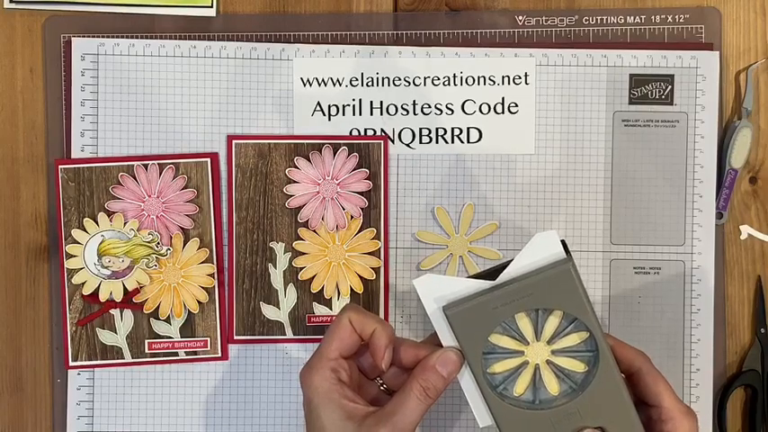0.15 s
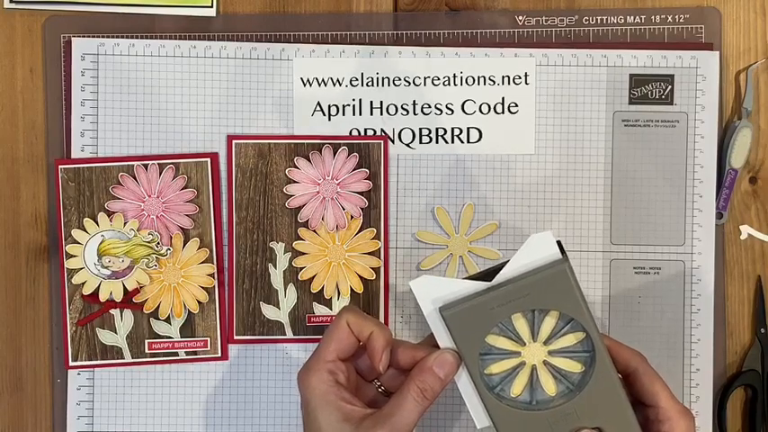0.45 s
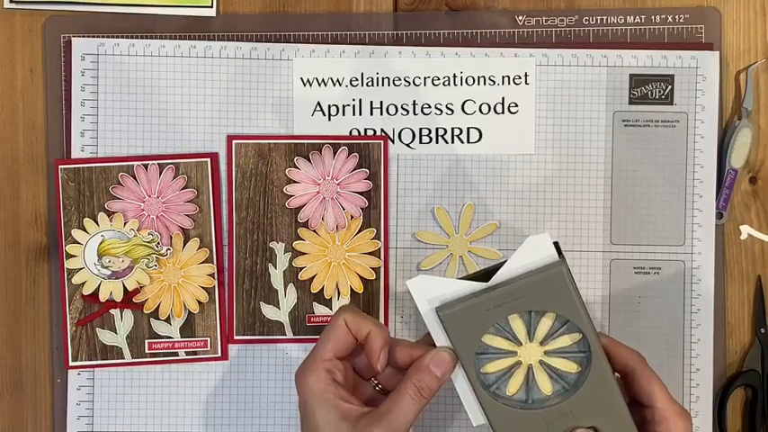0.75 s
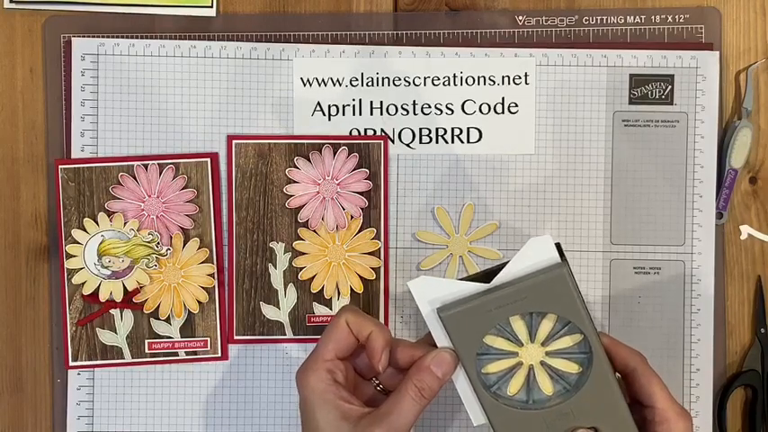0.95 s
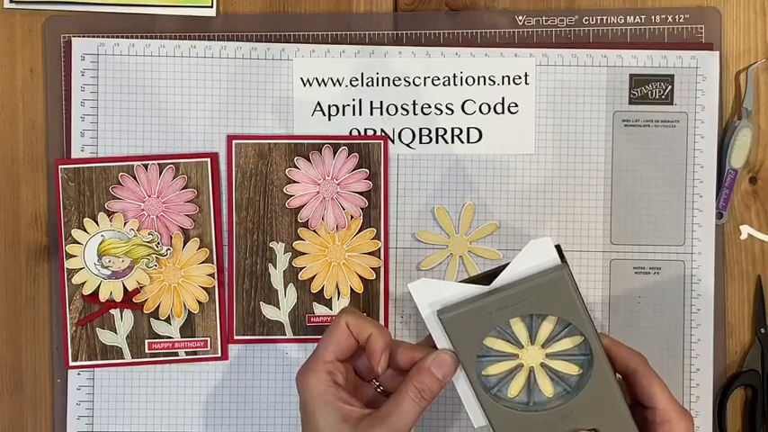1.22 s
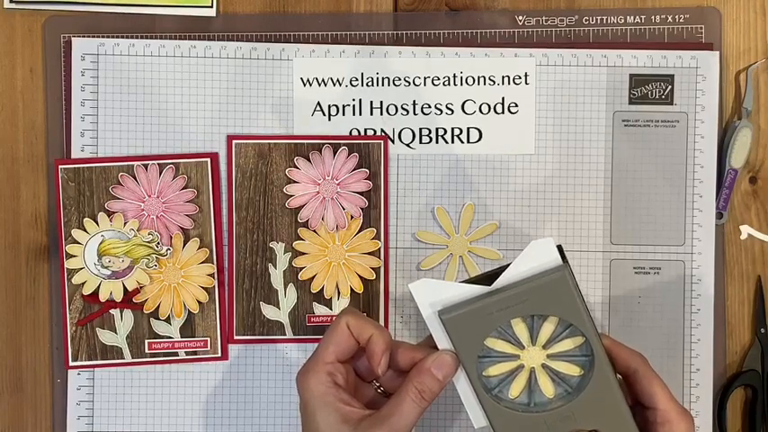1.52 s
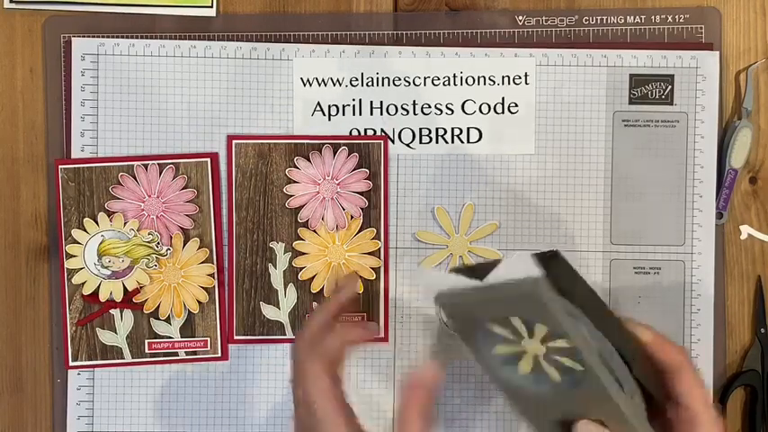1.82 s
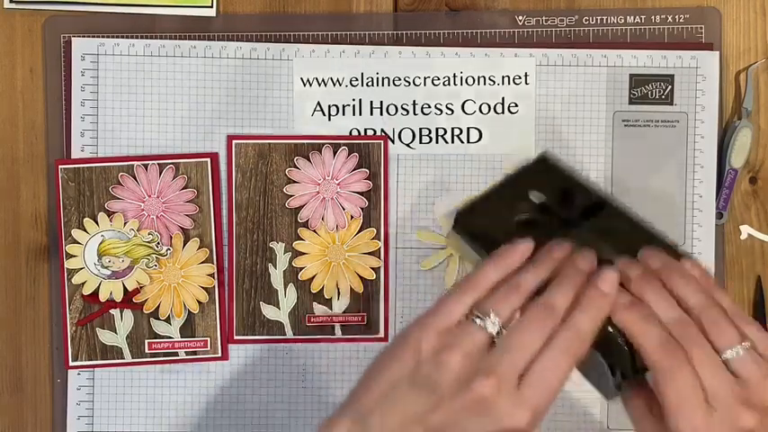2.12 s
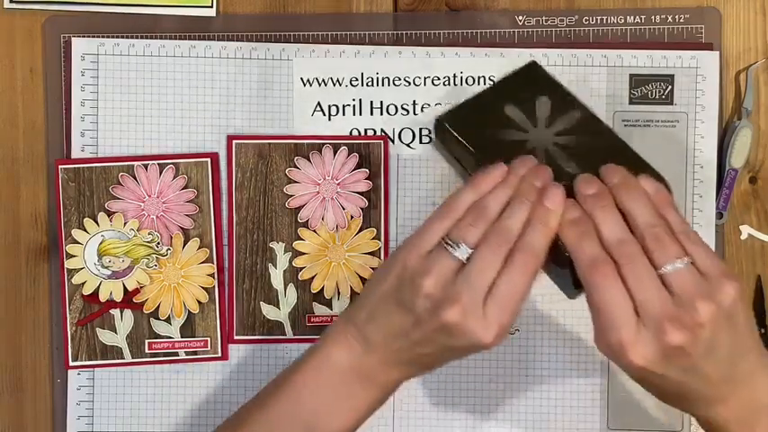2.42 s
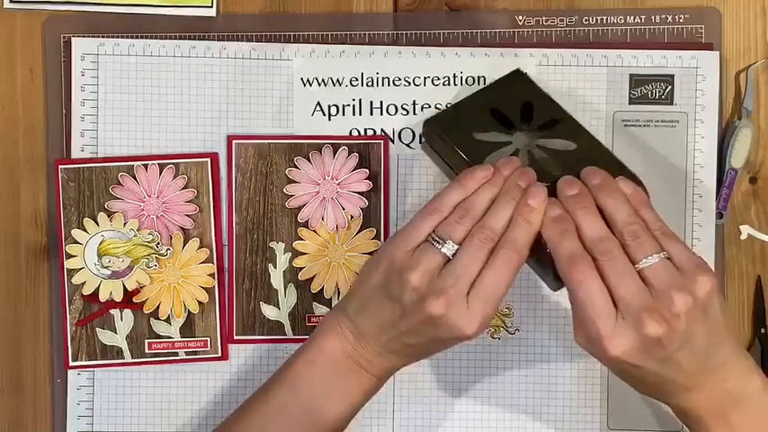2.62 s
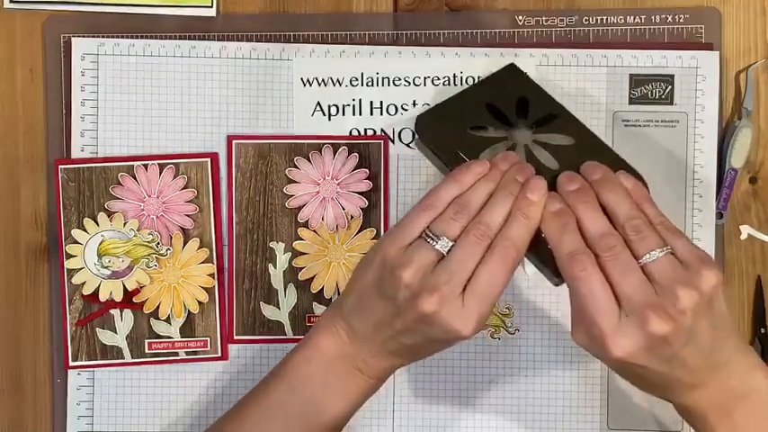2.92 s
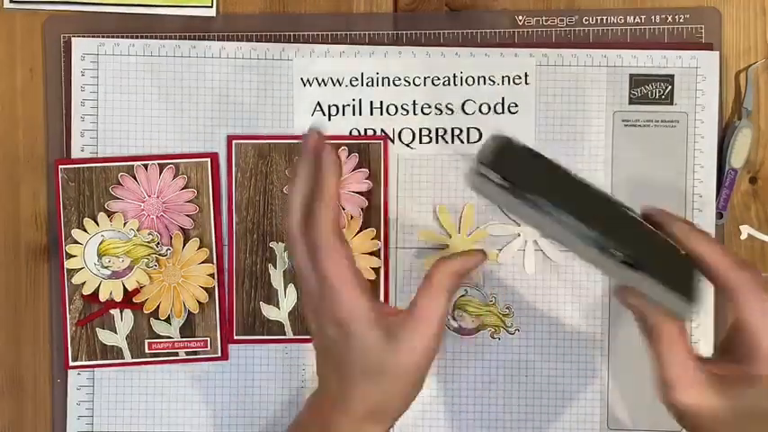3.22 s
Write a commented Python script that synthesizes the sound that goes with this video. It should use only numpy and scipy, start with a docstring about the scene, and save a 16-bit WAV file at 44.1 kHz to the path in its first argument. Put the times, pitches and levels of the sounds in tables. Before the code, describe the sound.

Paper punch squeezed by hand, clacking and creaking before snapping sharply through card.

```python
"""A handheld lever punch, squeezed with both hands over a craft table in a small room.
A faint, steady hiss sets the bed. Hands shift on the plastic, and the card ticks as it is let go.
The housing clacks as the lever takes up its slack, then creaks under load while the blade grates.
The steel die breaks through the card with one sharp snap that rings in the room and leaves the
return spring singing. A last soft touch and rub close the scene."""
import sys
import numpy as np
from scipy import signal
from scipy.fft import rfft, irfft, next_fast_len
from scipy.io import wavfile
from scipy.ndimage import uniform_filter1d

SR = 44100
rng = np.random.default_rng(int(sys.argv[2]) if len(sys.argv) > 2 else 0)


def materialize(psi):
    """Save the field psi as 16-bit PCM at rate SR to the path in sys.argv[1].

    A 1-D psi becomes a single channel; in a 2-D psi each row is a channel.
    """
    bounded = np.clip(np.atleast_2d(psi).T, -1, 1)
    quanta = np.round(bounded * 32767).astype(np.int16)
    wavfile.write(sys.argv[1], SR, quanta)


N = 147735

# Tone of the hiss bed. Each row: frequency in Hz, gain in dB.
HISS_EQ = [(15, -55), (28, -30.5), (41, -7), (68, -2.5), (86, -2.5), (133, -2), (157, -7), (403, -9),
           (587, -11.5), (654, -12), (729, -16.5), (812, -15.5), (2660, -23), (3130, -23.5), (5370, -25),
           (7830, -19.5), (9720, -27), (12700, -21), (15800, -27)]
# Thin whines in the hiss. Each row: centre in Hz, half-width in Hz, level in dB.
HISS_WHINES = [(6300, 200, -86.5), (7950, 70, -88.5), (13230, 90, -92.5)]
# Hands shifting on the punch. Each row: peak time in seconds, level in dB, half-length in seconds.
HAND_STROKES = [(0.2, -69.5, 0.088), (2.147, -71.5, 0.28), (3.35, -69.5, 0.041)]
# Tone of skin on plastic. Each row: frequency in Hz, gain in dB.
SKIN_EQ = [(60, -14.5), (200, 2.5), (450, 1), (1400, -6.5), (3500, -14), (8000, -25), (15000, -39.5)]
# Light touches on the card. Each row: peak time in seconds, rustle level in dB, rise and fall in
# seconds, tick gain in dB.
CARD_TOUCHES = [(1.791, -57, 0.0037, 0.0046, -50.5), (1.803, -62, 0.011, 0.031, -80),
                (1.887, -60, 0.0027, 0.0033, -61), (2.125, -61.5, .002, 0.0048, -81),
                (2.2693, -57, .001, 0.0045, -74.5), (3.345, -63, .008, 0.012, -78)]
# Tone of the card's rustle. Each row: frequency in Hz, gain in dB.
RUSTLE_EQ = [(100, -28.5), (600, -1), (1400, 0), (4000, -5), (7000, -5), (15000, -24)]
# The card ticking in its slot. Each row: pitch in Hz, gain in dB, T60 in seconds.
TICK_MODES = [(3890, 2.5, 0.019)]
# Reverb time of the room. Each row: frequency in Hz, T60 in seconds.
ROOM_DECAY = [(150, 0.69), (450, 0.31), (900, 0.48), (2000, 0.46), (3800, 0.45), (8000, 0.38),
              (15000, 0.33)]
# Reverb tone for touches and clacks. Each row: frequency in Hz, gain in dB.
CLICK_REVERB_EQ = [(150, -9), (400, -9), (850, -5.5), (1250, -11.5), (2000, -6.5), (3800, -6), (8000, -7.5),
                   (15000, -7)]
# Clacks and creaks of the housing. Each row: peak time in seconds, rasp level in dB, rise and fall in
# seconds, ring gain in dB, thud gain in dB, rasp tilt in dB per octave.
LEVER_SLIPS = [(2.2756, -39, 0.00027, 0.0035, -32, -53, -1.5),
               (2.2794, -39, 0.0014, 0.0029, -33, -40, -3.5),
               (2.3003, -45.5, 0.0019, .002, -51.5, -61.5, 2),
               (2.3036, -39.5, 0.001, .0015, -42.5, -47.5, -1),
               (2.359, -29, 0.0031, 0.0032, -24.5, -42, -4.5),
               (2.3610, -18.5, 0.0012, 0.0028, -13.5, -27.5, 2.7),
               (2.3680, -43.5, .001, .004, -27.5, -48.5, 2.5), (2.4220, -41, .002, 0.0049, -41, -46, 4),
               (2.4333, -50.5, 0.0018, 0.0035, -38, -51.5, 0.5),
               (2.4614, -34.5, 0.0028, 0.0047, -33, -50.5, -1),
               (2.4740, -39.5, 0.0025, .005, -42, -61.5, -4), (2.5080, -47, 0.0022, .004, -51, -63.5, 6),
               (2.556, -51, .002, 0.0085, -56, -67.5, 2.5), (2.5649, -34, 0.0011, 0.0056, -34, -43, -1),
               (2.5890, -40, 0.0044, 0.0061, -33, -52, -2),
               (2.6009, -33.5, 0.0022, 0.0026, -36, -38.5, -0.5),
               (2.6388, -42.5, 0.00089, .004, -44.5, -47.5, -0.5),
               (2.6722, -37, 0.001, 0.0044, -43, -53.5, 2.5),
               (2.6800, -37, 0.0019, 0.0057, -37.5, -55, -0.5),
               (2.6857, -34.5, 0.0021, 0.0032, -34.5, -44, -0.5),
               (2.7700, -57, 0.013, 0.018, -59, -66.5, -3)]
# Tone of slipping plastic. Each row: frequency in Hz, gain in dB.
RASP_EQ = [(100, -22.5), (350, -12), (750, -7), (1250, -1), (2300, 2), (4800, -1.5), (6300, -2.5),
           (9000, -6), (15500, -9)]
# Ring of the plastic housing. Each row: pitch in Hz, gain in dB, T60 in seconds.
HOUSING_MODES = [(1070, -16, .02), (1185, -4.5, 0.038), (1315, -1, 0.036), (1826, -11, 0.028),
                 (2350, -18, .025), (3320, -18.5, 0.022), (4130, -17.5, .02), (5980, -17, 0.022),
                 (7340, -17, .015)]
# Dull thud of the whole punch in the hands. Each row: pitch in Hz, gain in dB, T60 in seconds.
THUD_MODES = [(216, -6.5, 0.034), (324, -0.5, 0.032), (484, -2.5, 0.031)]
# The cutting edge grating on the card. Each row: pitch in Hz, gain in dB, T60 in seconds.
BLADE_MODES = [(3370, 0, .013), (5100, -1.5, .009), (6250, -0.5, .02)]
# The card giving way. Each row: peak time in seconds, level in dB, rise and fall in seconds.
CARD_CRACKS = [(2.788, -21.5, 0.00029, 0.0025), (2.7907, -16.5, 0.00047, 0.0016),
               (2.7929, -12.5, 0.0012, 0.0025), (2.7972, -23, 0.00072, 0.0016)]
# Tone of shearing card. Each row: frequency in Hz, gain in dB.
SHEAR_EQ = [(100, -27.5), (400, -3), (900, -7.5), (1300, -4.5), (2600, -1.5), (4000, 4.5), (4900, -2.5),
            (7500, -8.5), (10000, -8.5), (15500, -15.5)]
# Ring of the steel die. Each row: pitch in Hz, gain in dB, T60 in seconds.
DIE_MODES = [(1810, -4, 0.018), (2200, -11, 0.034), (2560, -11, 0.045), (3210, -6, 0.015),
             (3620, -10, .018), (4300, 2, 0.012), (5076, -6, .014), (5600, -18.5, 0.015), (6700, -7, .009),
             (9000, -11.5, 0.0097)]
# Song of the return spring. Each row: pitch in Hz, level in dB, T60 in seconds.
SPRING_MODES = [(3680, -45, .38), (3930, -50, .42), (4715, -54, .38)]
# Knock of the lever on its stop. Each row: pitch in Hz, gain in dB, T60 in seconds.
STOP_MODES = [(151, -16, 0.025), (345, -3, 0.011), (712, -2.5, 0.019), (910, 0.5, 0.021), (1070, -1, 0.02),
              (1457, -6, 0.027)]
# Reverb tone for the snap. Each row: frequency in Hz, gain in dB.
SNAP_REVERB_EQ = [(150, -15), (450, -9), (900, -5), (1250, -9.5), (2100, -9), (2600, -5.5), (3100, -9.5),
                  (3800, -5.5), (4600, -15), (5500, -7.5), (7500, -2.5), (9000, -7.5), (15000, -6.5)]

LEAD_S, TAIL_S = .04, .7
T = np.arange(-round(LEAD_S * SR), round(TAIL_S * SR)) / SR  # seconds around a hit


def amp(db):
    """Decibels to gain."""
    return 10 ** (np.asarray(db) / 20)


def unit(x):
    """Scale to rms 1."""
    return x / np.sqrt(np.mean(x ** 2) + 1e-20)


def along(points, hz):
    """Read a curve of (Hz, value) points on a log frequency axis."""
    freqs, values = np.transpose(points)
    return np.interp(np.log(hz + 1), np.log(freqs + 1), values)


def filtered(x, response):
    """Zero-phase filter; response gives the gain at each frequency."""
    size = next_fast_len(len(x) + SR // 2)
    return irfft(rfft(x, size) * response(np.fft.rfftfreq(size, 1 / SR)), size)[:len(x)]


def noise(response):
    """Scene-long filtered noise at rms 1."""
    return unit(filtered(rng.standard_normal(N), response))


def coloured(x, eq, tilt_db=0, size=2048):
    """Minimum-phase EQ at unit power gain, with a tilt per octave."""
    hz = np.fft.rfftfreq(size, 1 / SR)
    gain = unit(amp(along(eq, hz) + tilt_db * np.log2(hz + 1)))
    cepstrum = irfft(np.log(gain))
    cepstrum[1:size // 2] *= 2
    cepstrum[size // 2 + 1:] = 0
    return signal.fftconvolve(x, irfft(np.exp(rfft(cepstrum))))[:len(x)]


def burst(rise, fall, graininess=.35, evenness=.65):
    """A cluster of micro-contacts that swells and dies, its spectrum partly flattened."""
    envelope = np.exp(-np.abs(T) / (np.where(T < 0, rise, fall) + 1e-5))
    grains = rng.standard_normal(len(T)) * np.exp(graininess * rng.standard_normal(len(T)))
    spectrum = rfft(envelope * grains)
    even = irfft(spectrum / (np.abs(spectrum) + 1e-9) ** evenness, len(T))
    gate = np.minimum(1, 10 * envelope)
    return unit(even * gate) * np.sqrt(np.mean(envelope ** 2))


def ring(modes, scatter_db=1, detune=.002):
    """Damped modes of alternating polarity, a little different at each hit."""
    t = np.maximum(T, 0)
    out = np.zeros(len(T))
    for k, (hz, db, t60) in enumerate(modes):
        gain = amp(db + scatter_db * rng.standard_normal())
        pitch = hz * (1 + detune * rng.standard_normal())
        out += (-1) ** k * gain * np.exp(-np.log(1000) * t / t60) * np.sin(2 * np.pi * pitch * t)
    return out


def at(s, x):
    """Place a hit on the timeline at s seconds."""
    return np.interp(np.arange(N) - round(s * SR), np.round(T * SR), x, left=0, right=0)


def hiss_bed(level_db=-67):
    """Room air and microphone hiss with thin whines; the treble buzzes faintly and flickers."""
    hiss = amp(level_db) * noise(lambda hz: amp(along(HISS_EQ, hz)))
    for centre, width, db in HISS_WHINES:
        hiss += amp(db) * noise(lambda hz: 1 / (1 + ((hz - centre) / width) ** 2))
    return flicker(buzz(hiss))


def buzz(hiss, rate_hz=30, depth_db=8, width_cycles=.05, above_hz=5500):
    """The treble pulses twice a cycle, strong then weak."""
    cycle = np.arange(N) / SR * rate_hz % 1
    strong, weak = (np.exp(-((cycle - peak) / width_cycles) ** 2) for peak in (.25, .75))
    gain = unit(amp(depth_db * (strong + .45 * weak)))
    return hiss + (gain - 1) * filtered(hiss, lambda hz: hz > above_hz)


def flicker(hiss, spread_db=2.5, above_hz=9000):
    """The top end wavers in small random patches of time and frequency."""
    hz, _, bands = signal.stft(hiss, SR, nperseg=256)
    patches = uniform_filter1d(rng.standard_normal(bands.shape), size=12, axis=0)
    patches = unit(uniform_filter1d(patches, size=4, axis=1))
    gain = amp(spread_db * patches * (hz > above_hz)[:, None])
    return signal.istft(bands * gain, SR, nperseg=256)[1][:N]


def hand_rubs():
    """Skin slides softly over the plastic."""
    t = np.arange(N) / SR
    swells = sum(amp(db) * np.exp(-((t - s) / half) ** 2) for s, db, half in HAND_STROKES)
    return swells * noise(lambda hz: amp(along(SKIN_EQ, hz)))


def card_touches(send_db=-.5):
    """Fingers leave the card, which rustles and ticks in its slot."""
    out = np.zeros(N)
    for s, db, rise, fall, tick_db in CARD_TOUCHES:
        rustle = amp(db) * coloured(burst(rise, fall), RUSTLE_EQ)
        tick = amp(tick_db) * ring(TICK_MODES)
        out += at(s, rustle + tick + amp(send_db) * room(rustle, CLICK_REVERB_EQ))
    return out


def room(hit, eq, blur_hz=260, predelay_s=.0034, build_s=.0024):
    """Diffuse reverb: it takes the hit's broad spectrum, and each band dies at its own speed."""
    hz, t, bands = signal.stft(rng.standard_normal(len(T)), SR, nperseg=256)
    decay = np.exp(-np.log(1000) * np.abs(t - LEAD_S) / along(ROOM_DECAY, hz)[:, None])
    tail = signal.istft(bands * decay, SR, nperseg=256)[1][:len(T)]
    tail *= np.clip((T - predelay_s) / build_s, 0, 1)
    tail /= np.linalg.norm(tail)
    # The room gathers sound from all sides, which evens out its spectrum.
    blur_bins = max(1, round(blur_hz * len(hit) / SR))
    power = np.abs(uniform_filter1d(np.abs(rfft(hit)) ** 2, blur_bins))
    hit_hz = np.fft.rfftfreq(len(hit), 1 / SR)
    return filtered(tail, lambda f: amp(along(eq, f)) * np.sqrt(np.interp(f, hit_hz, power)))


def housing_creaks(bite_s=2.5, grate_db=-5.5):
    """Each lever slip rasps, rings the housing and nudges the punch; once the blade bites, it grates."""
    out = np.zeros(N)
    for s, db, rise, fall, ring_db, thud_db, tilt_db in LEVER_SLIPS:
        rasp = amp(db) * coloured(burst(rise, fall), RASP_EQ, tilt_db)
        hit = rasp + amp(ring_db) * ring(HOUSING_MODES) + amp(thud_db) * ring(THUD_MODES)
        if s > bite_s:
            hit += amp(db + grate_db) * blade_grate(rise, fall)
        out += at(s, hit + room(hit, CLICK_REVERB_EQ))
    return out


def blade_grate(rise, fall):
    """A burst of friction on the card drives the modes of the cutting edge."""
    friction = burst(rise, fall)
    edge = ring(BLADE_MODES)[T >= 0]
    return signal.fftconvolve(friction, edge / np.linalg.norm(edge))[:len(T)]


def snap(die_s=2.7924, die_db=-11.5, stop_s=2.7942, stop_db=-16.5):
    """The card cracks in quick stages, the freed die rings, the lever lands and the spring sings on."""
    cracks = sum(at(s, amp(db) * coloured(burst(rise, fall), SHEAR_EQ))
                 for s, db, rise, fall in CARD_CRACKS)
    die = at(die_s, amp(die_db) * ring(DIE_MODES))
    stop = at(stop_s, amp(stop_db) * ring(STOP_MODES))
    hit = cracks + die + stop
    return hit + at(die_s, room(hit, SNAP_REVERB_EQ, blur_hz=600) + ring(SPRING_MODES))


def scene():
    """Mono mix, heard from above the table."""
    low_cut = signal.butter(2, 120, "high", fs=SR, output="sos")  # the small punch radiates little bass
    punch = signal.sosfilt(low_cut, housing_creaks() + snap())
    return (punch + card_touches() + hand_rubs() + hiss_bed())[None]


def record(dry, top_hz=15750, edge_hz=200):
    """A steep high cut on the whole mix."""
    return np.array([filtered(channel, lambda hz: np.clip((top_hz - hz) / edge_hz + .5, 0, 1))
                     for channel in dry])


dry = scene()
out = record(dry)
materialize(out)
```